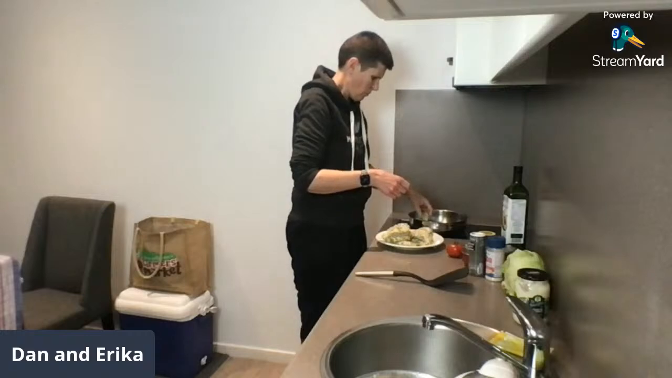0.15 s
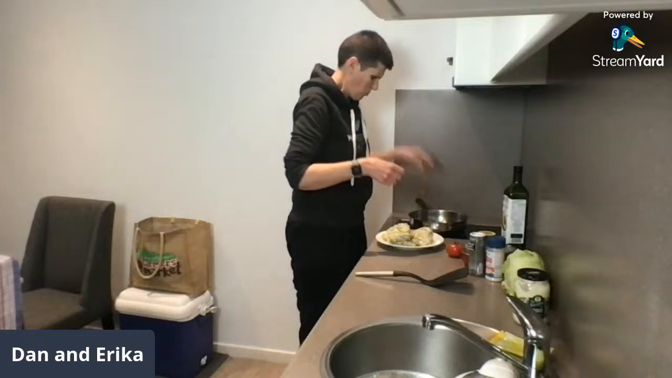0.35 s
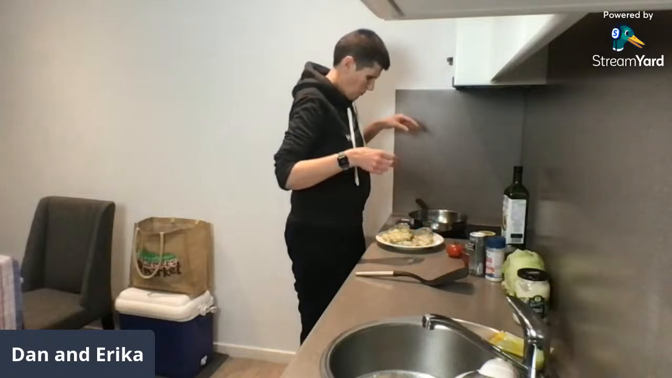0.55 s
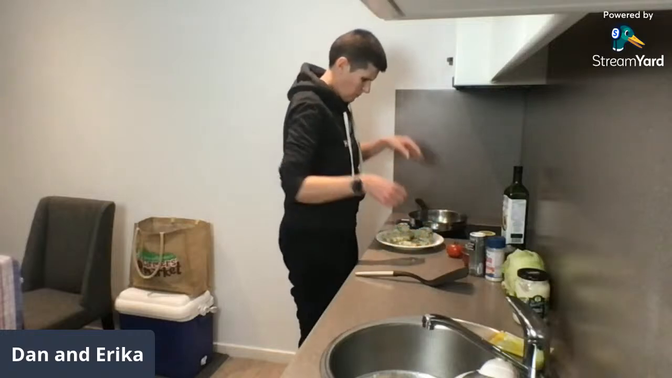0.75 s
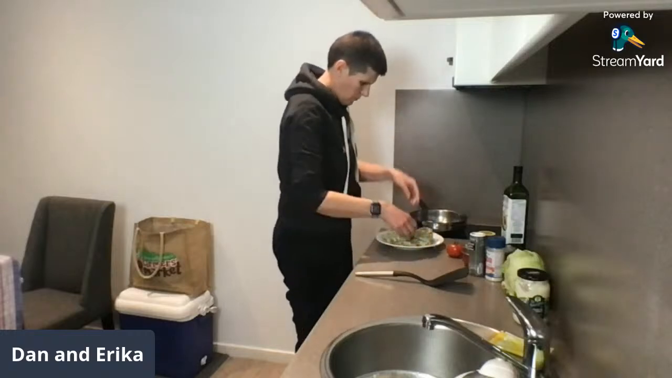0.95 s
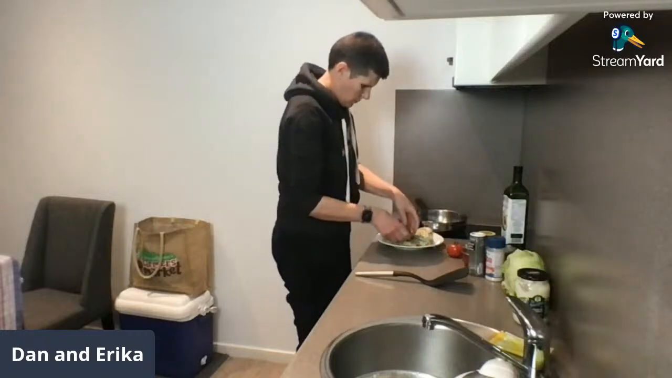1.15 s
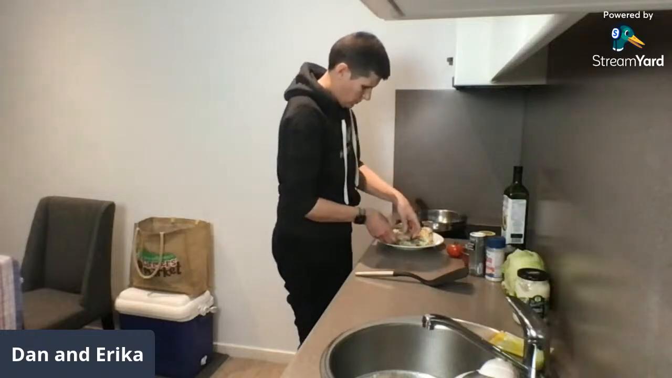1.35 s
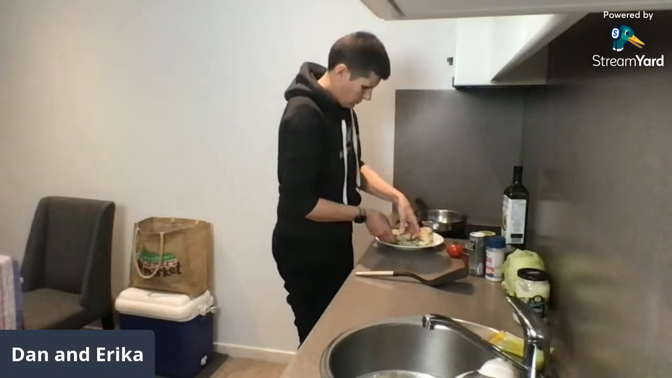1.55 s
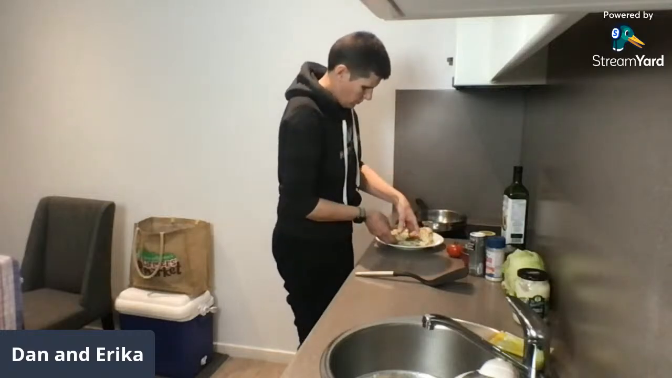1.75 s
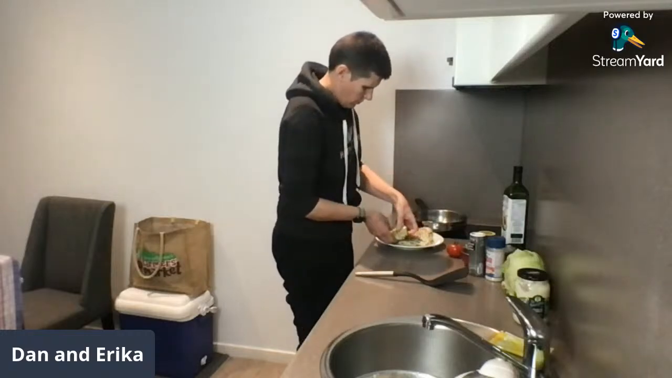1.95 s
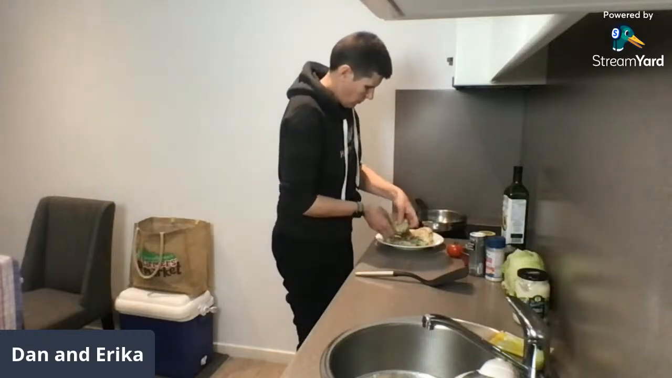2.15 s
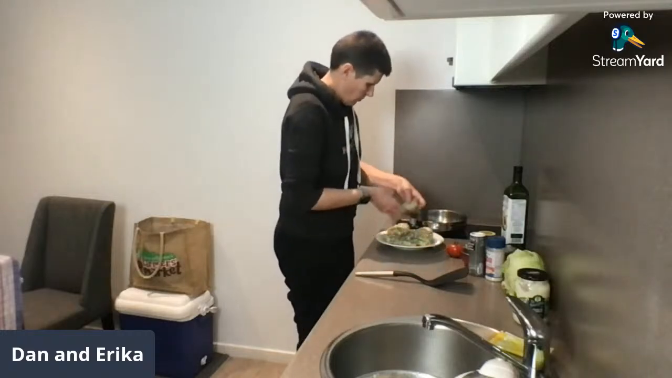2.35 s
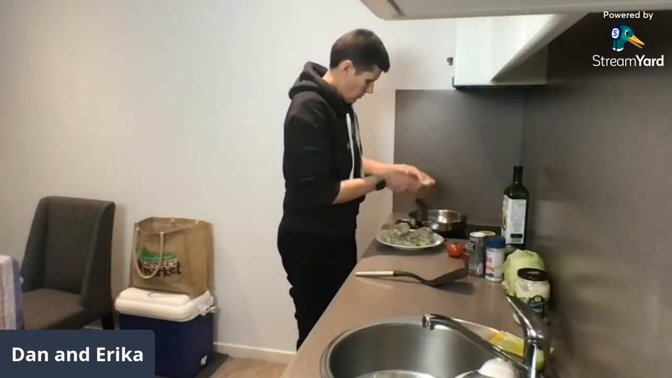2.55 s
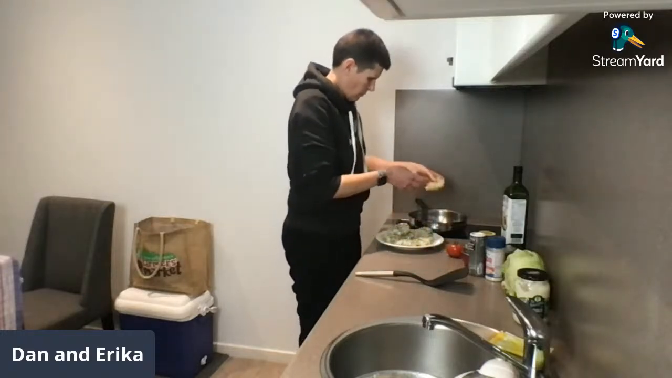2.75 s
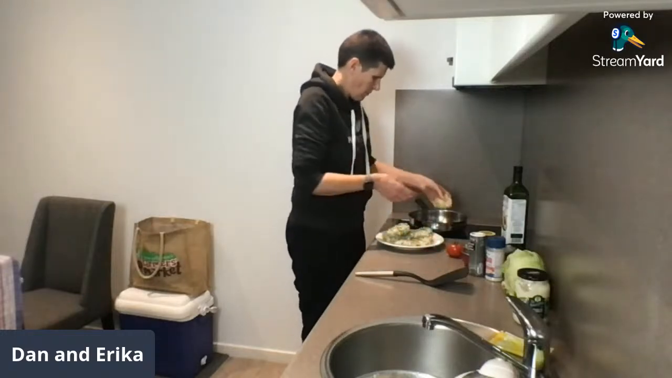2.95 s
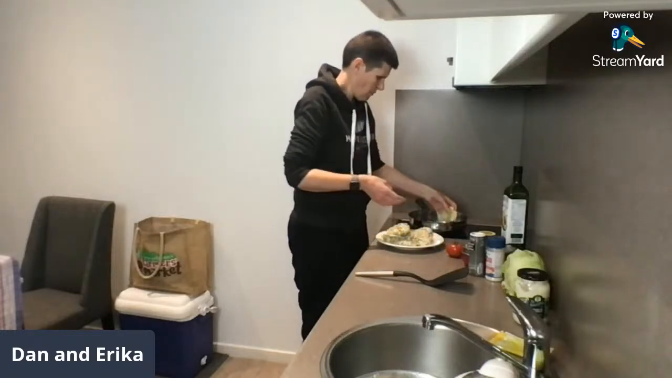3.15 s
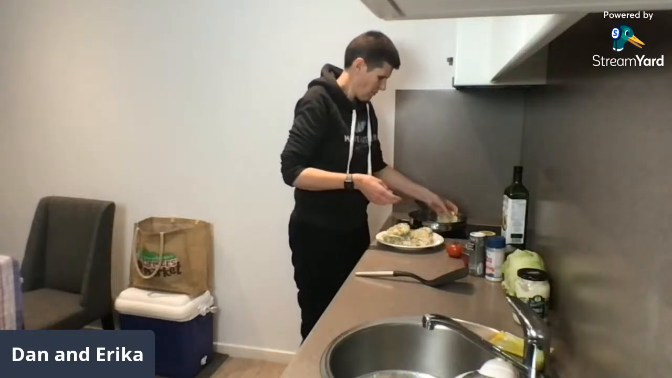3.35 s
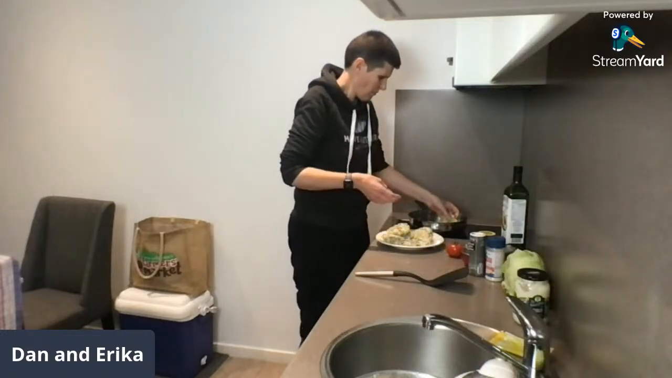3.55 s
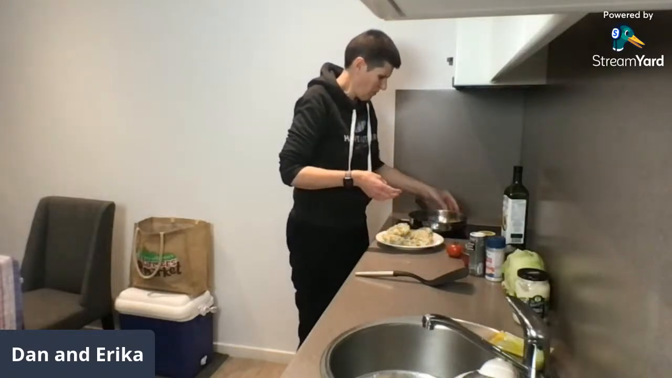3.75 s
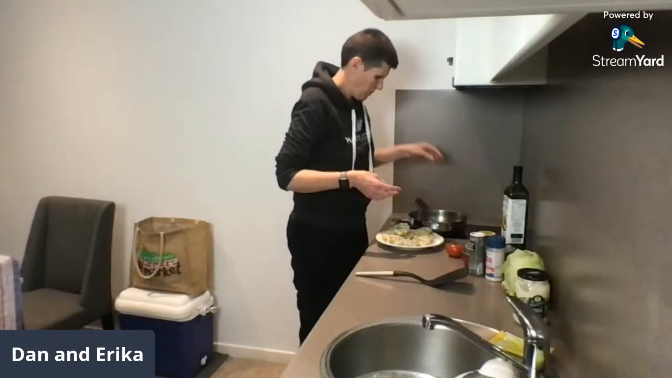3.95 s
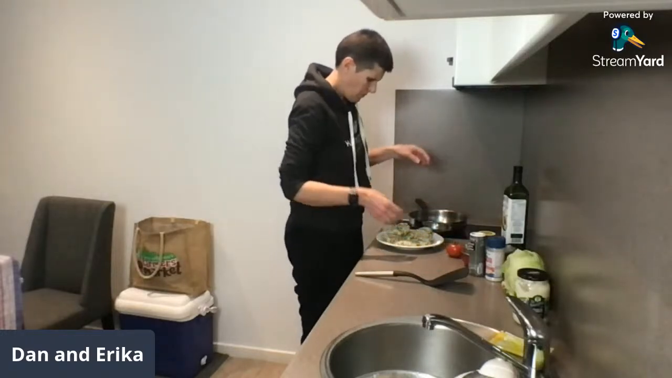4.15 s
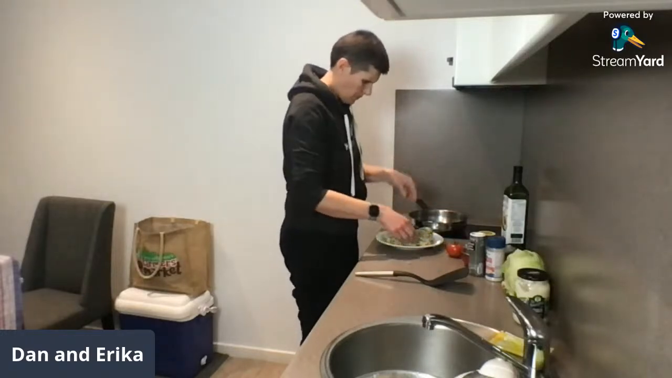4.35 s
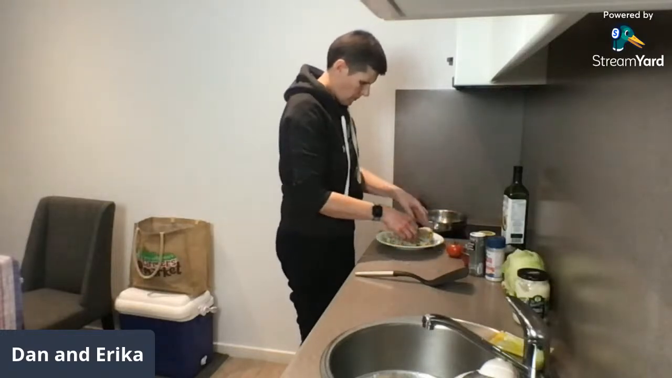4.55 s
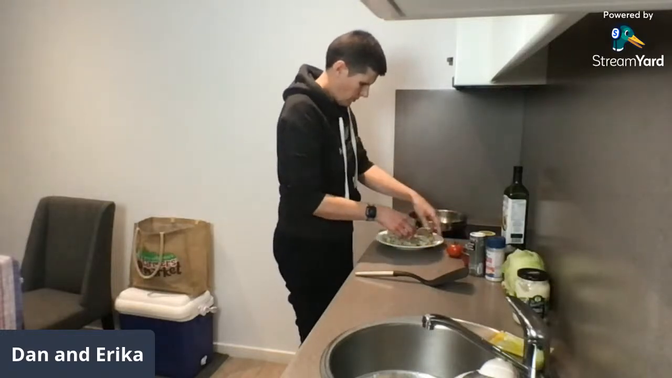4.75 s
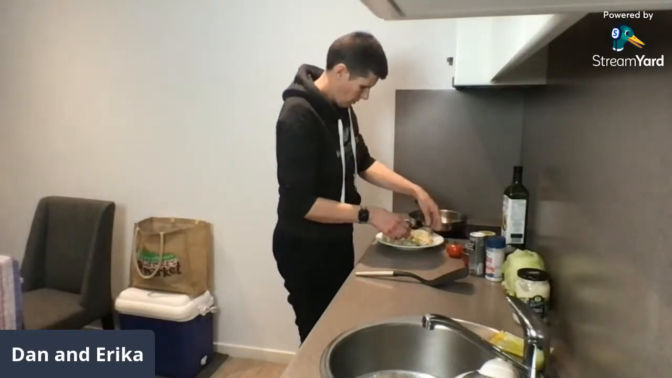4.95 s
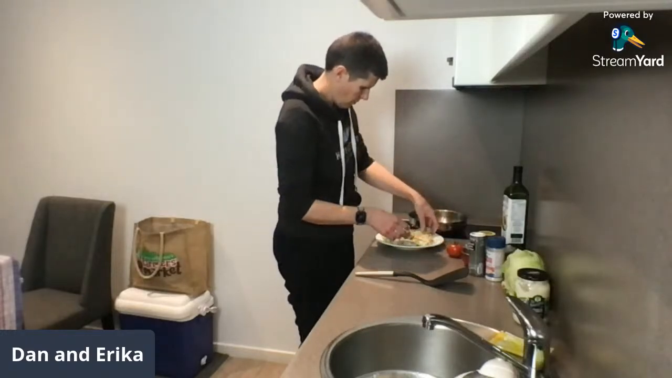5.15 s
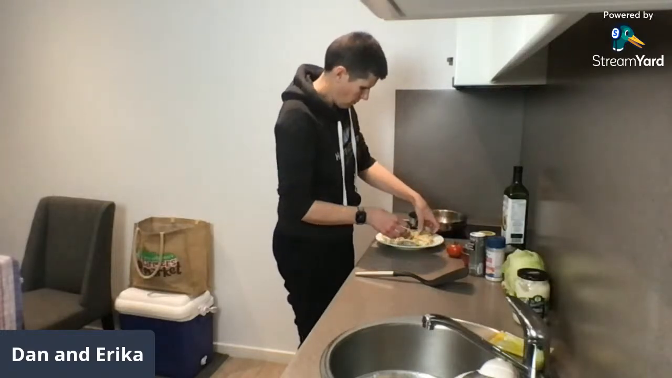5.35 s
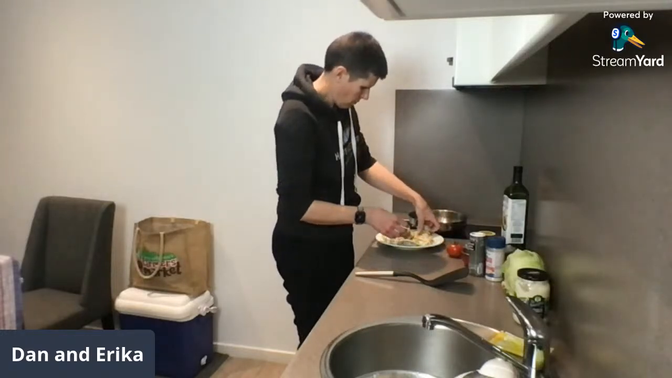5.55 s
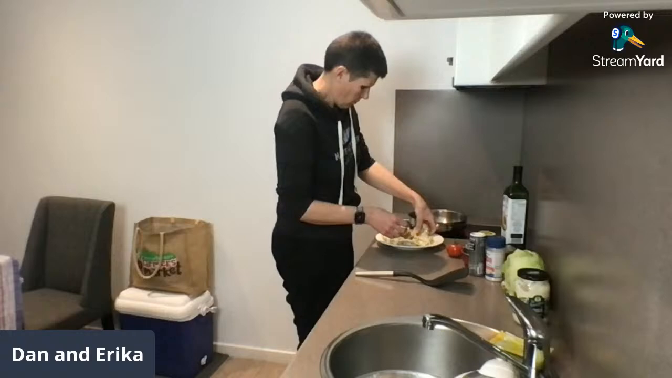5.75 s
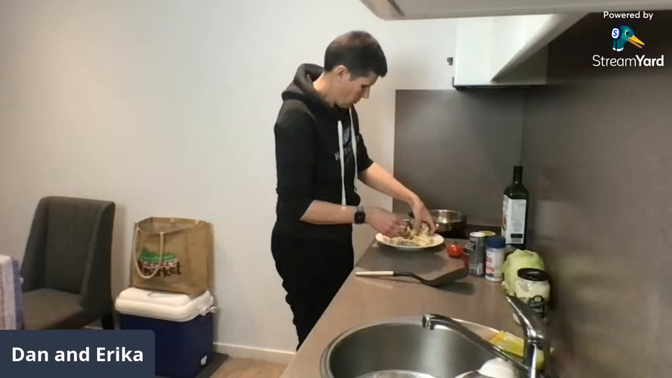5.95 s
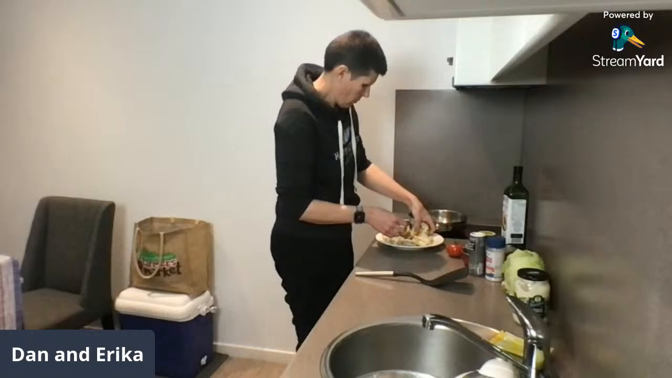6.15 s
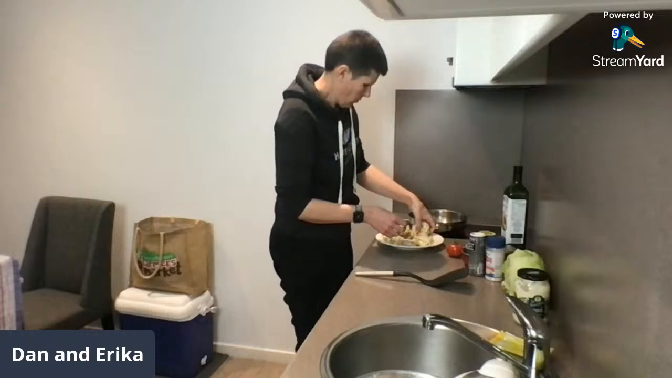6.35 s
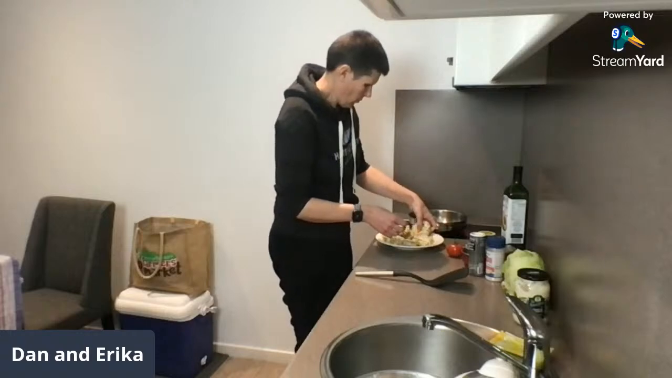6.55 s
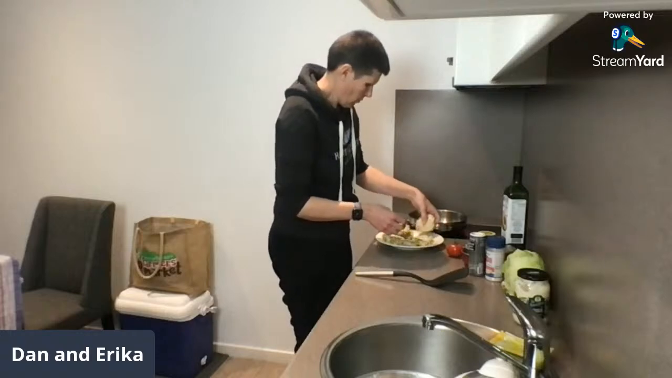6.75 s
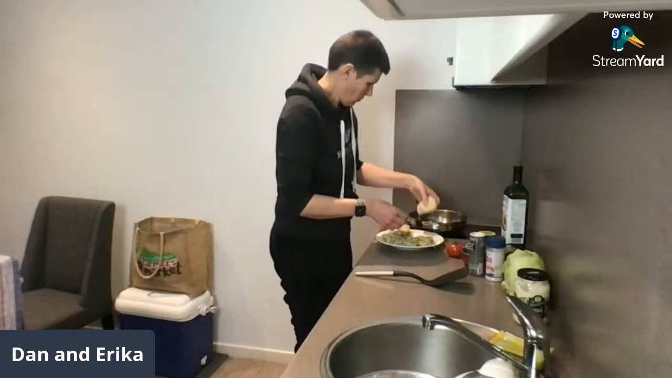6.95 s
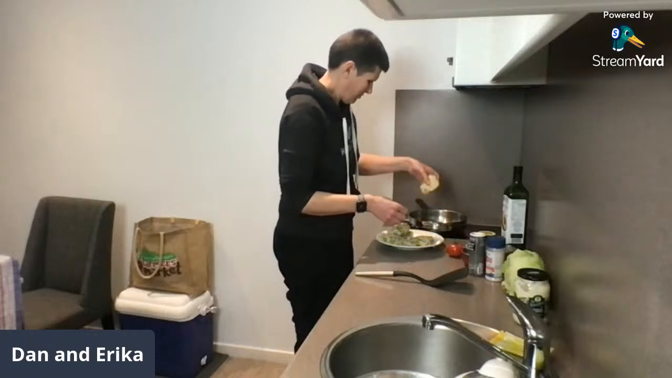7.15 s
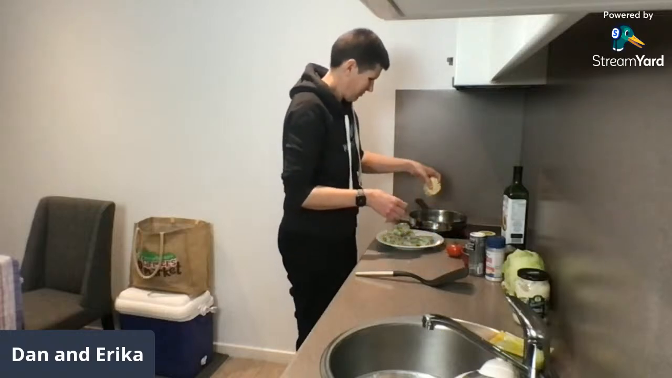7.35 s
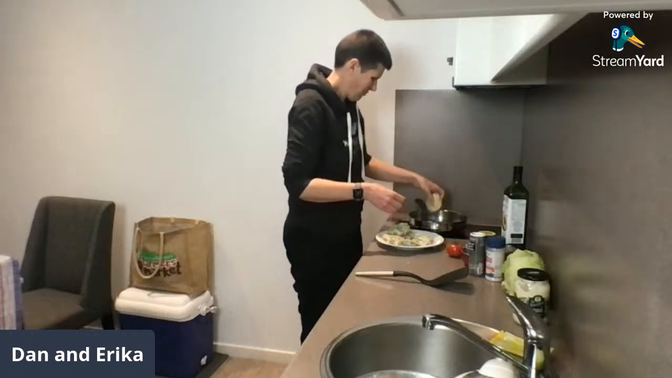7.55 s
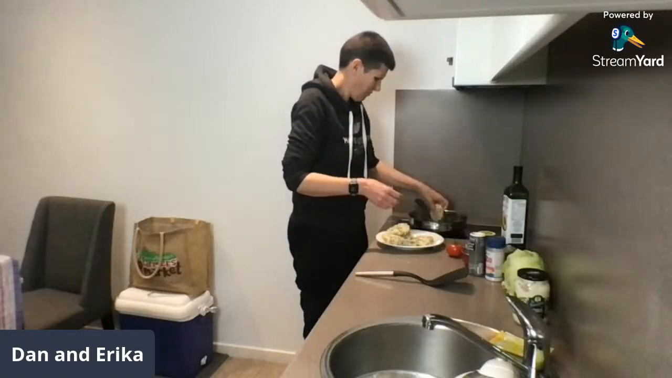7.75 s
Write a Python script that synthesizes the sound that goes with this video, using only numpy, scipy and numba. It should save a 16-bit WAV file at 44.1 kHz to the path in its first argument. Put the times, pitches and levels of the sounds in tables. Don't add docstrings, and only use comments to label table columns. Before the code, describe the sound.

After a near-silent instant, frying bursts into dense crackling fizz, surges again with a second patty, and the hot pan snaps once midway.

```python
import sys
import numpy as np
from scipy import signal
from scipy.fft import rfft, irfft, next_fast_len
from scipy.io import wavfile
from scipy.ndimage import uniform_filter1d
from numba import njit

SR = 44100
rng = np.random.default_rng(int(sys.argv[2]) if len(sys.argv) > 2 else 0)


def store_wav(level_fs):
    pcm = np.round(np.clip(np.atleast_2d(level_fs), -1, 1) * 32767)
    wavfile.write(sys.argv[1], SR, pcm.T.astype(np.int16))


def decibels_to_gain(level_db):
    exponent = np.asarray(level_db, float) / 20
    return 10 ** exponent


N = 344862
CLICK_S = 3.2405


def level(x, db):
    return x * decibels_to_gain(db) / np.sqrt(np.mean(x ** 2))


def shape_db(hz, points):
    f, db = np.transpose(points)
    return np.interp(np.log(hz + 1), np.log(f), db, left=-70)


def walk(rate):
    hold = int(SR / rate)
    w = np.repeat(rng.standard_normal(N // hold + 1), hold)
    w = uniform_filter1d(uniform_filter1d(w, hold), hold)[:N]
    return w / w.std()


def band_filter(x, order, hz, kind):
    return signal.sosfilt(signal.butter(order, hz, kind, fs=SR, output="sos"), x)


@njit
def rings(start, hz, t60, size, length, swell):
    y = np.zeros(length)
    for k in range(len(start)):
        turn = np.exp(2j * np.pi * hz[k] / SR - np.log(1000) / (t60[k] * SR))
        z = size[k] + 0j
        gap, close = 1., np.exp(-1 / (swell * t60[k] * SR))
        for i in range(start[k], min(length, start[k] + int(t60[k] * SR))):
            gap *= close
            y[i] += z.imag * (1 - gap)
            z *= turn
    return y


def pan_gain(hz):
    # f/Hz, width/Hz, level/dB over the fizz colour
    pan_modes = [(493, 27, -1.5), (633.6, 40, 13), (790, 30, 8.5), (900, 55, 8.5), (1355, 38, 7),
                 (1778, 65, 4.5), (2373, 76, 7.5), (3990, 150, 2), (5200, 200, 1), (7790, 390, -5),
                 (8110, 190, 5.5), (9470, 180, 2)]
    # f/Hz, width/Hz, level/dB
    niche = [(2570, 110, -2), (2760, 70, 2.5), (2880, 70, -1.5), (3200, 150, -1), (3400, 160, 1.5),
             (4760, 120, -1), (6250, 100, 1.5), (7940, 120, -3), (8400, 200, -1.5), (9150, 190, 1.5),
             (9800, 150, -1.5), (10300, 100, -3.5), (10500, 200, 1.5), (11000, 150, -3), (11350, 200, -1),
             (11950, 120, 2.5)]
    return decibels_to_gain(sum(db / (1 + (2 * (hz - f) / width) ** 2) for f, width, db in pan_modes + niche))


def remnant():
    # f/Hz, peak level/dB, t60/s
    old_tones = [(2250, -76, 0.17), (2420, -78, 0.16), (560, -68, 0.3), (1000, -74, 0.2)]
    hz, db, t60 = np.transpose(old_tones)
    return rings(np.zeros(len(hz), np.int64), hz, t60, decibels_to_gain(db), N, 0.02)


def fan():
    # f/Hz, level/dB per Hz
    fan_colour = [(15, -42), (25, -26), (87, 4.5), (134, -4), (188, -5), (249, -4), (353, -7.5),
                  (450, -14.5), (580, -35), (990, -120)]
    # f/Hz, peak level/dB against the rumble
    hum_tones = [(100, -5.5), (185, -13.5)]
    # t/s, lift/dB
    gusts = [(0.06, 2), (0.35, 3), (0.54, 7), (0.7, 10), (1.27, 7), (1.55, -3), (1.63, 3), (2.07, 4),
             (2.15, 6), (2.33, 4), (2.55, -3), (2.67, 4), (2.75, -5), (3.0, 2), (3.15, -3), (3.55, -5),
             (3.72, 1), (4.35, 6), (4.68, 6), (4.85, -4), (5.05, -6), (5.31, 7.5), (5.47, 8), (5.85, -3),
             (6.2, 5), (6.35, 5), (6.45, -6), (6.6, 3), (6.75, -3), (6.86, 7), (7.05, -8), (7.14, 5),
             (7.5, -4), (7.68, 3), (7.77, -3)]
    fan_db, gust_s, gust_upper_share, gust_top_hz = -59.5, 0.057, 0.12, 130
    size = next_fast_len(N)
    hz = np.arange(size // 2 + 1) * SR / size
    tilt = decibels_to_gain(shape_db(hz, fan_colour)) / (1 + (hz / 520) ** 4)
    air = rfft(rng.standard_normal(N), size) * tilt
    deep = 1 / (1 + (hz / gust_top_hz) ** 6)
    waver = decibels_to_gain(2.3 * walk(16))
    low = irfft(air * deep, size)[:N] * waver
    upper = irfft(air * (1 - deep), size)[:N] * waver
    spread = np.std(low + upper)
    t = np.arange(N) / SR
    hum = sum(decibels_to_gain(db + 3.0 * walk(18)) * np.sin(2 * np.pi * f * t) for f, db in hum_tones)
    gust_db = sum(db * np.exp(-((t - s) / gust_s) ** 2) for s, db in gusts)
    stirred = (low / spread + hum) * decibels_to_gain(gust_db)
    return decibels_to_gain(fan_db) * (stirred + upper / spread * decibels_to_gain(gust_upper_share * gust_db))


def slaps():
    # t/s, peak level/dB
    oil_slaps = [(0.406, -25.5), (1.009, -43), (1.188, -35), (1.467, -37), (2.319, -37), (2.539, -34),
                 (2.933, -34), (3.321, -31), (3.725, -36), (4.436, -33), (4.702, -36), (5.41, -36),
                 (5.466, -30), (5.598, -32.5), (6.151, -34), (6.463, -36), (6.526, -41), (6.606, -34),
                 (6.666, -36), (6.842, -35), (6.891, -39), (7.32, -34)]
    t60, slap_db, low_hz, high_hz = 0.088, -8, 430, 1710
    out = np.zeros(N + 4096)
    t = np.arange(4096) / SR
    shape = decibels_to_gain(-60 * t / t60) * (1 - np.exp(-t / 0.0015))
    for s, db in oil_slaps:
        noise = band_filter(rng.standard_normal(4096), 2, [low_hz, high_hz], "bandpass")
        i = int(s * SR)
        out[i:i + 4096] += level(noise, db + slap_db) * shape
    return out[:N]


def glugs():
    # t/s, peak level/dB, f/Hz
    slow_bubbles = [(0.416, -25.5, 653), (0.469, -27.5, 635), (0.579, -31.5, 883), (0.605, -30, 513),
                    (0.782, -33.5, 624), (0.941, -36, 638), (1.187, -33, 620), (1.289, -35, 630),
                    (1.415, -37, 643), (1.942, -38.5, 630), (2.302, -40, 627), (2.329, -39.5, 790),
                    (2.539, -39, 760), (3.469, -44.5, 205), (3.927, -36, 675), (4.009, -36.5, 816),
                    (4.199, -38, 860), (4.703, -40, 754), (4.753, -43, 905), (5.411, -39, 630),
                    (6.151, -42.5, 400), (6.153, -40, 1104), (6.461, -41.5, 790), (6.526, -42, 632),
                    (6.527, -42, 1270), (6.891, -37, 1384), (0.44, -40.5, 190), (6.161, -46.5, 260),
                    (2.33, -45, 327), (6.841, -44, 620), (7.322, -38, 770), (1.735, -50, 365),
                    (3.64, -47, 360), (4.21, -45, 360), (4.619, -43, 367), (5.83, -48, 350),
                    (0.58, -43, 188), (3.75, -45, 205), (0.86, -40, 634), (1.06, -41, 640),
                    (7.331, -48, 355)]
    s, peak_db, hz = np.transpose(slow_bubbles)
    t60 = 0.096 * decibels_to_gain(0.28 * (peak_db + 36))
    out = rings((s * SR).astype(np.int64), hz, t60, decibels_to_gain(peak_db + 4.0), N, 0.087)
    for _ in range(4):
        late, off = rng.standard_normal((2, len(s)))
        start = ((s + 0.012 * np.abs(late)) * SR).astype(np.int64)
        pitch = hz * np.exp(np.clip(0.24 * off, -0.12, 0.45))
        out += rings(start, pitch, 0.5 * t60, decibels_to_gain(peak_db - 4.0), N, 0.07)
    return out


def knock():
    # f/Hz, peak level/dB, t60/s
    wall_tones = [(1850, -23.5, 0.029), (2140, -20, 0.04), (2380, -26, 0.059), (2770, -26, 0.04),
                  (3450, -18.5, 0.036), (4520, -16, 0.022)]
    knock_s = 7.3212
    hz, db, t60 = np.transpose(wall_tones)
    return rings(np.full(len(hz), int(knock_s * SR)), hz, t60, decibels_to_gain(db), N, 0.016)


def click():
    # f/Hz, level/dB, t60/s
    snap_tones = [(350, -27.5, 0.059), (657, -19.5, 0.062), (773, -17.5, .045), (950, -21.5, 0.036),
                  (1740, -16.5, .03), (2130, -9, 0.034), (2370, -12, 0.026), (3160, -11, 0.04),
                  (3670, -12, 0.026), (3880, -13, .03), (4300, -11, 0.024), (4600, -11, 0.031),
                  (5200, -17, 0.024)]
    click_db, tail_db, tail_s = -4, -22, 0.067
    edge_s, edge_hz, edge_db, edge_t60 = 3.24183, 3900.0, -5, 0.0012
    hz, db, t60 = np.transpose(snap_tones)
    ring = rings(np.full(len(hz), int(CLICK_S * SR)), hz, t60, decibels_to_gain(db + click_db), N, 0.041)
    edge = rings(np.array([int(edge_s * SR)]), np.array([edge_hz]), np.array([edge_t60]),
                 np.array([decibels_to_gain(edge_db)]), N, 0.022)
    t = np.arange(N) / SR - CLICK_S
    wash = band_filter(rng.standard_normal(N), 3, [1300, 4900], "bandpass")
    shape = np.where(t < 0, np.exp(np.minimum(t, 0) / 0.0023), decibels_to_gain(-60 * np.abs(t) / tail_s))
    return ring + edge + level(wash, tail_db) * shape


def ticks():
    # t/s, peak level/dB, f/Hz
    cracks = [(0.275, -18, 6100), (0.383, -12, 4300), (0.5262, -6.5, 5600), (1.1199, -6, 6300),
              (1.1511, -14, 5200), (1.1932, -10, 6000), (1.2826, -15, 5700), (1.5909, -20, 5800),
              (1.6656, -23, 6200), (1.7061, -20.5, 4600), (1.8433, -16, 6600), (1.9359, -17.5, 5600),
              (2.032, -16, 6300), (2.0903, -11.5, 5300), (2.1005, -16, 5200), (2.1904, -10, 6300),
              (2.315, -18, 5200), (2.4496, -16.5, 6300), (2.5392, -14, 4900), (2.5475, -19, 7000),
              (3.0859, -17, 10600), (3.2421, 2, 3600), (3.2415, -15, 11000), (7.3213, -5, 8000),
              (5.1575, -13, 5960), (6.0935, -17, 4500), (5.538, -17, 3500), (5.868, -18, 4500),
              (3.622, -21, 4200), (3.6297, -28, 5900), (4.1587, -14, 6200), (4.4405, -9.5, 3600),
              (5.4125, -10.5, 9500), (3.6572, -14, 4200), (0.4275, -9, 4500), (5.4205, -12, 9050),
              (5.338, -18, 11000), (4.653, -14, 4700), (4.658, -14, 4000), (4.996, -17, 5000),
              (7.144, -17, 4500), (4.6993, -13, 5500), (5.159, -8, 10500), (5.5888, -17, 5900),
              (5.7675, -20, 5300), (6.0612, -16, 4500), (6.1186, -18, 5100), (6.2048, -11, 6000),
              (6.2407, -8, 9300), (6.4958, -15, 6000), (6.5666, -14, 5200), (6.814, -11, 8400),
              (7.0166, -15, 7000), (7.0333, -24, 8800), (7.0809, -15.5, 6300), (7.2251, -19, 8500),
              (7.5326, -20, 5900), (7.5426, -24, 7600), (7.5971, -15, 5700)]
    cycles, tick_db = 5.2, -2
    s, peak_db, hz = np.transpose(cracks)
    start = ((s - 0.37 / hz) * SR).astype(np.int64)
    out = rings(start, hz, cycles / hz, 2 * decibels_to_gain(peak_db + tick_db), N, 0.068)
    return band_filter(out, 3, 1700, "highpass")


def drops():
    # t/s, peak level/dB, bubble f/Hz
    big_drops = [(1.162, -13.5, 1760), (2.5048, -19.5, 1770), (2.695, -16, 2380), (3.324, -15, 1790),
                 (3.9284, -13, 1760), (4.0053, -33, 1910), (4.2851, -31, 1880), (4.4373, -9, 2470),
                 (4.487, -16, 2420), (4.651, -12, 2420), (4.698, -14.5, 2330), (4.9945, -17, 2380),
                 (5.0422, -16.5, 2570), (5.468, -6.5, 2570), (5.5363, -19, 2740), (5.653, -16, 2380),
                 (5.865, -13, 2380), (6.151, -18, 1810), (6.205, -24, 2400), (6.526, -19, 2400),
                 (6.706, -24, 2380), (6.668, -17.5, 2010), (6.8425, -17.5, 2320), (7.143, -20, 1850)]
    # t/s, peak level/dB, bubble f/Hz, spray level/dB against the peak
    middle_drops = [(0.4315, -8, 4360, -30), (0.804, -14, 3500, -13), (1.0071, -20, 3920, -5),
                    (1.1133, -11, 5470, -16), (1.191, -17, 4200, -9), (1.2813, -11.5, 6100, -33),
                    (1.361, -16.5, 4530, -6), (1.469, -15.5, 5900, -29), (1.5035, -15, 5800, -19),
                    (1.6643, -12.5, 5200, -15), (1.724, -20, 3920, -8), (1.8425, -20, 5640, -10.5),
                    (1.9347, -19, 5200, -24), (2.0895, -10.5, 5200, -24), (2.0995, -10, 5130, -22),
                    (2.189, -6, 6100, -12.5), (2.368, -19, 4610, -7), (2.4488, -15, 6200, -10),
                    (2.5373, -15.5, 3860, -10), (2.603, -19, 5540, -30), (2.787, -18.5, 5800, -21),
                    (2.8808, -18, 6000, -7), (2.933, -18.5, 3570, -18), (3.038, -22, 3940, -7),
                    (3.0718, -19.5, 3910, -5.5), (3.3227, -17.5, 4050, -6), (3.3687, -17.5, 3680, -11),
                    (3.4063, -21, 4200, -6), (3.6565, -15, 4200, -10),
                    (3.7448, -22, 3990, -21), (4.966, -19, 4700, -22), (5.1576, -16, 5760, -29),
                    (5.2752, -11, 5400, -11), (5.325, -23, 6740, -4), (5.4117, -13, 5370, -21),
                    (5.453, -14, 5810, -12.5), (5.929, -19, 4520, -19), (6.06, -19, 3900, -21),
                    (6.091, -15.5, 4120, -5), (6.118, -21, 4500, -9), (6.2028, -13.5, 4540, -6),
                    (6.5652, -13.5, 4900, -17), (6.7, -19, 5600, -26), (6.9161, -18.5, 4600, -6.5),
                    (7.0793, -15, 6600, -12), (7.1735, -21, 5400, -12), (7.4993, -25, 6740, -6),
                    (7.531, -24, 5550, -2), (7.5959, -18, 5340, -7)]
    # t/s, peak level/dB, bubble f/Hz
    fine_drops = [(2.5131, -19, 11300), (3.083, -18, 11700), (3.5143, -26.5, 8130), (4.899, -24, 8800),
                  (5.1575, -9.5, 12000), (6.24, -13, 10500), (6.606, -10, 9100), (6.745, -15, 9450),
                  (6.815, -9.5, 12800), (6.8947, -20, 11900), (7.0086, -16, 10500), (7.128, -23.5, 8110),
                  (7.224, -11.5, 9200), (7.746, -20, 12000)]
    # tail t60/s, crack level/dB against the peak
    drop_kinds = [
        (0.079, -11),
        (0.076, -9),
        (0.056, -7.5),
    ]
    # peak level/dB, bubble f/Hz, spray level/dB, tail t60/s, crack level/dB
    largest_drop = (-2, 5900, -10, 0.05, -15)
    big_spray_db, fine_spray_db, largest_s = -27, -18, 7.3208
    big, middle, fine = drop_kinds
    rows = [(*row, big_spray_db, *big) for row in big_drops]
    rows += [(*row, *middle) for row in middle_drops]
    rows += [(*row, fine_spray_db, *fine) for row in fine_drops]
    rows += [(largest_s, *largest_drop)]
    return np.transpose(rows)


def spits():
    s, peak_db, hz, spray_db, t60, crack_db = drops()
    out = rings((s * SR).astype(np.int64) + 40, hz, 10 / hz, 2 * decibels_to_gain(peak_db + crack_db), N, 0.04)
    t = np.arange(4096) / SR - 0.006
    f = np.arange(2049) * SR / 4096
    pan = pan_gain(f)
    for k in range(len(s)):
        noise = rfft(rng.standard_normal(4096))
        own_band = 1 / (1 + ((f - hz[k]) / (0.2 * hz[k])) ** 4)
        wide = (f > np.clip(0.55 * hz[k], 1400, 2800)) * (f < 7500)
        wide_share = 0.24 + 0.24 * np.abs(np.log2(hz[k] / 5000))
        splat = level(irfft(noise * (own_band + wide_share * wide) * pan), -15.5)
        splat = splat + level(irfft(noise * (f > 7800)), spray_db[k] - 4.5)
        fade = decibels_to_gain(-60 * t / np.clip(t60[k], 0.02, 0.2))
        shape = np.where(t < 0, np.exp(t / 0.0011), fade)
        lumps = 0.85 * uniform_filter1d(np.repeat(rng.standard_normal(32), 128), size=128)
        shape = shape * decibels_to_gain(1.7 * lumps)
        i = int(s[k] * SR) - 220
        part = (splat * shape * decibels_to_gain(peak_db[k]))[:N - i]
        out[i:i + len(part)] += part
    return out


def bubbles(cycles, spread_db, count):
    when, pitch, luck, life = rng.random((count, 4)).T
    hz = 500 * 22 ** pitch
    size = decibels_to_gain(np.minimum(-spread_db * np.log(1 - luck), 12)) * hz / 5000
    return rings((when * N).astype(np.int64), hz, cycles * (0.38 + 1.5 * life) / hz, size, N, 0.024)


def spurts(tail_s, count):
    when, luck = rng.random((count, 2)).T
    kicks = np.zeros(N)
    kicks[(when * N).astype(int)] = 0.32 + luck
    lift = signal.lfilter([1], [1, -np.exp(-1 / (tail_s * SR))], kicks)
    lift = uniform_filter1d(lift, size=120)
    return np.minimum((lift - lift.mean()) / lift.std(), 2)


def surges():
    # t/s, lift/dB
    vents = [(0.436, -0.5), (0.541, 3.5), (0.821, 3.5), (0.983, -1), (1.116, 0), (1.203, 4.5),
             (1.245, -5.5), (1.297, 0), (1.431, -4.5), (1.675, 1.5), (1.833, -3.8), (1.937, 2.5),
             (2.048, -0.5), (2.098, 1), (2.198, 5), (2.266, 0.5), (2.355, -1.5), (2.528, 2.5), (2.59, -2),
             (2.832, -3.5), (2.889, 4.5), (2.996, -3), (3.08, -3), (3.187, -1), (3.249, 0.5), (3.331, 4.5),
             (3.474, -3.5), (3.628, -3), (3.705, 0.5), (3.773, 1.5), (3.855, 6), (4.074, 3), (4.708, 2.5),
             (4.752, 2.5), (4.9, 1.5), (4.545, 3), (7.013, 2), (4.43, 3.5), (4.63, -1), (5.025, -1.5),
             (5.159, 0), (5.274, 2.5), (5.418, 7.5), (5.466, 0.5), (5.545, 4), (5.631, -1.5), (5.692, -6),
             (6.104, 3), (6.174, -2.0), (6.222, 4.5), (6.408, -5), (6.572, 1.5), (6.615, 0), (6.786, -4.5),
             (6.825, 1), (6.912, 3), (6.958, -2.2), (7.016, -1), (7.115, -6), (7.328, 10), (7.47, -1.5),
             (7.537, -1), (7.601, 7.5), (7.718, -5), (7.818, -4)]
    slow_s, quick_s, share = 0.021, 0.012, 0.75
    s, db = np.transpose(vents)[:, :, None]
    t = np.arange(0, N + 64, 64) / SR
    span_s = np.where((t < s) == (db > 0), quick_s, slow_s)
    lift_db = (db * np.exp(-((t - s) / span_s) ** 2)).sum(axis=0)
    return share * np.interp(np.arange(N) / SR, t, lift_db)


def landing():
    # t/s, lasts/s, strength 0-1
    patties = [
        (0.136, 0.29, 1.01),
        (3.715, 0.25, 0.6),
    ]
    t = np.arange(N) / SR
    return sum(share * (t > s) * np.exp(-((t - s) / lasts_s) ** 4) for s, lasts_s, share in patties)


def sprays():
    # t/s, lasts/s, lift/dB
    mist = [(0.166, 0.018, 3), (0.24, 0.024, 2), (0.305, 0.016, 2), (0.425, .015, 1), (1.011, .014, 2.5),
            (1.119, .02, 2), (1.445, .02, 1), (2.505, .02, 1.5), (3.068, .03, 2), (3.77, 0.027, 4.5),
            (3.851, .035, 1), (4.084, .02, 2), (4.65, .02, 3), (4.725, 0.018, -1), (1.36, 0.028, 1),
            (1.2, .03, 0.5), (4.905, .02, 1.5), (4.99, .015, 4), (5.265, 0.018, 3.5), (5.324, 0.02, 5.5),
            (5.411, 0.012, 3), (5.44, .025, 0), (5.528, .02, 3), (5.585, .02, 1), (5.75, .02, 2),
            (5.81, .02, 1), (6.091, 0.019, 4), (6.565, .02, 4.5), (6.605, .02, 2), (6.895, .02, 2),
            (7.068, .02, 2), (7.267, .02, 3)]
    edge_s = 0.002
    out = np.zeros(N)
    for s, lasts_s, db in mist:
        out[int(s * SR):int((s + lasts_s) * SR)] += db
    return uniform_filter1d(out, int(edge_s * SR))


def boil_levels():
    # t/s, boil level/dB, coarseness/dB
    boil = [(0.2, -35.5, 2.5), (0.26, -29.5, -5), (0.39, -29, -2.5), (0.45, -28, 2), (0.77, -31, -2),
            (0.95, -34.5, -2), (1.3, -34, 2), (1.45, -38, 2.5), (2.9, -39.5, 1.5), (3.69, -37.5, -4),
            (3.76, -32, -2), (3.92, -30.5, -2.5), (4.0, -31, 3.5), (4.2, -32, 3), (4.9, -37, 1.5),
            (6.6, -37.5, -3), (7.6, -40.5, -5.5), (7.82, -41.5, -7)]
    # level/dB against the boil, share of boil change, share of coarseness,
    # suppressed level/dB, opening/s
    sizes = [
        (-12.5, 1.39, 1.06, -81, 0.055),
        (-3.5, 1.005, 0.54, -90, 0.021),
        (-0.62, 0.99, 0.24, -91, 0.012),
        (0.5, 0.95, 0.23, -90, .018),
    ]
    middle_db, gate_opens_s, gate_jump = -36, 0.128, 0.16
    stir_db, stir_s = 7.5, 0.11
    t = np.arange(N) / SR
    s, *columns = np.transpose(boil)
    boil_db, coarse_db = (np.interp(t, s, c) for c in columns)
    coarse_db = coarse_db + stir_db * (t > CLICK_S) * np.exp(-((t - CLICK_S) / stir_s) ** 4)
    out = []
    for k, (db, share, coarse, gated_db, opening_s) in enumerate(sizes):
        open_db = middle_db + db + share * (boil_db - middle_db) + coarse * coarse_db
        closed = np.exp(-np.maximum(t - gate_opens_s, 0) / opening_s)
        closed = closed * (1 - gate_jump * (t > gate_opens_s) * k)
        out.append(open_db + (gated_db - open_db) * closed)
    return out


def fizz():
    # f/Hz, level/dB per Hz
    fizz_colour = [(180, -51), (300, -17), (565, -9.5), (634, -8), (1010, -8.5), (1120, -1), (1530, -6),
                   (1750, 2.5), (2320, 0), (2610, -2), (4020, -1), (6100, -0.5), (7690, -7), (13500, -5),
                   (16000, -7.5)]
    # f/Hz, lift/dB
    landing_colour = [(1000, -1), (1700, 0.5), (2400, 5), (2850, 6), (3400, -0.5), (4200, 3), (6000, -4.5),
                      (9600, 1.5), (11400, -4), (15000, -1)]
    flicker_span_s, patchy_db = 0.35, 3.5
    fill_db_per_s = 0.8
    landing_db, landing_s = 4, 0.43
    big_db, medium_db, small_db, spray_db = boil_levels()
    size = next_fast_len(N)
    hz = np.arange(size // 2 + 1) * SR / size
    source = level(rng.standard_normal(N), 0)
    source = source + level(bubbles(25.0, 2.44, count=40000), -7.0)
    source = source + level(bubbles(155, 3.5, count=5000), -13)
    source = source + level(bubbles(3, 4.3, count=4000), -14.5)
    source = rfft(source, size) * decibels_to_gain(shape_db(hz, fizz_colour)) * pan_gain(hz)
    t = np.arange(N) / SR
    ring_shift_db = fill_db_per_s * (t - t.mean()) + landing_db * np.exp(-(t / landing_s) ** 4)
    place = 4 * np.log2(np.maximum(hz, 1) / 300)
    groups = np.zeros((4, N))
    surge = walk(12)
    puffs, high_puffs = (spurts(0.0065, count=260) for _ in range(2))
    vents_db, fresh, mist_db = surges(), landing(), sprays()
    for k in range(24):
        if k % 4 == 0:
            near = walk(11) + 0.71 * spurts(0.0045, count=200)
        share = np.clip(1 - np.abs(place - k), 0, 1)
        flicker_db = 0.074 * surge + 0.49 * near + (3.1 - 0.094 * k) * walk(18)
        flicker_db += 0.97 * puffs + 0.5 * high_puffs * (k > 16)
        flicker_db -= uniform_filter1d(flicker_db, int(flicker_span_s * SR))
        flicker_db += min(k / 12, 1) * vents_db
        flicker_db += fresh * shape_db(300 * 2 ** (k / 4), landing_colour) * (k > 6)
        flicker_db += np.clip((k - 17) / 4, 0, 1) * mist_db
        if k in (4, 5):
            flicker_db += patchy_db * np.minimum(walk(9), 0)
        if k in (10, 12):
            flicker_db += (k - 11) * ring_shift_db
        if k in (13, 14):
            flicker_db += 0.11 * (medium_db + 47.0)
        group = (k > 9) + (k > 14) + (k > 18)
        groups[group] += irfft(source * share, size)[:N] * decibels_to_gain(flicker_db)
    big, medium, small, spray = (level(g, 0) for g in groups)
    return decibels_to_gain(big_db) * big + decibels_to_gain(medium_db) * medium + decibels_to_gain(small_db) * small + decibels_to_gain(spray_db) * spray


def scene():
    background = remnant() + fan()
    oil = slaps() + glugs()
    snap = band_filter(click(), 3, [280, 9000], "bandpass")
    bursts = band_filter(spits() + knock(), 4, 500, "highpass")
    return np.tile(background + oil + snap + ticks() + bursts + fizz(), (2, 1))


def roll_off(x):
    return signal.sosfilt(signal.butter(12, 16970, fs=SR, output="sos"), x)


def record(dry):
    top_hz = 15780
    soft = 1.5 * np.tanh(dry / 1.5)
    soft = soft - uniform_filter1d(soft - dry, size=96)
    mix = signal.sosfilt(signal.ellip(10, 0.2, 80, top_hz, fs=SR, output="sos"), soft)
    return roll_off(mix)


dry = scene()
out = record(dry)
store_wav(out)
```